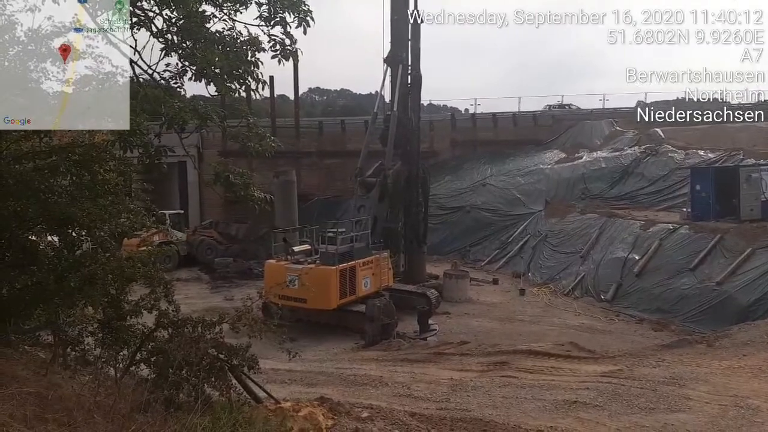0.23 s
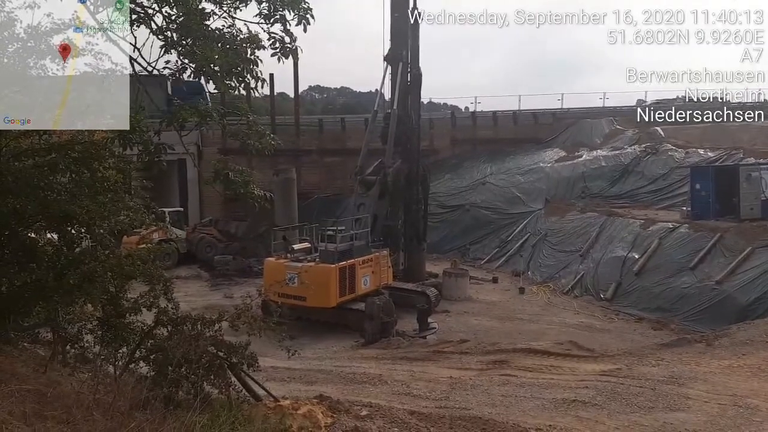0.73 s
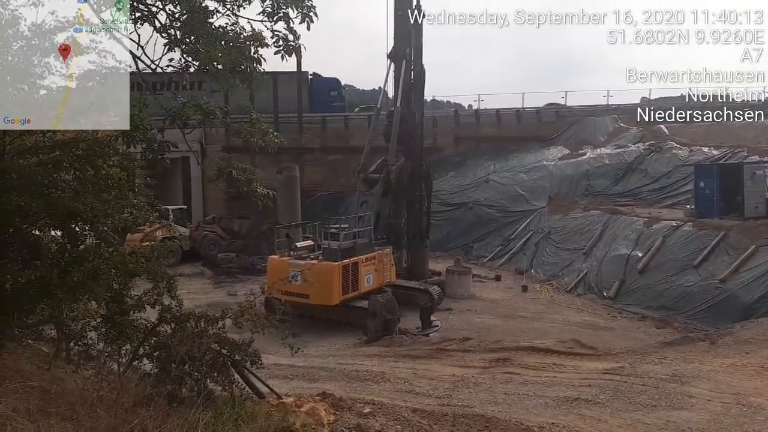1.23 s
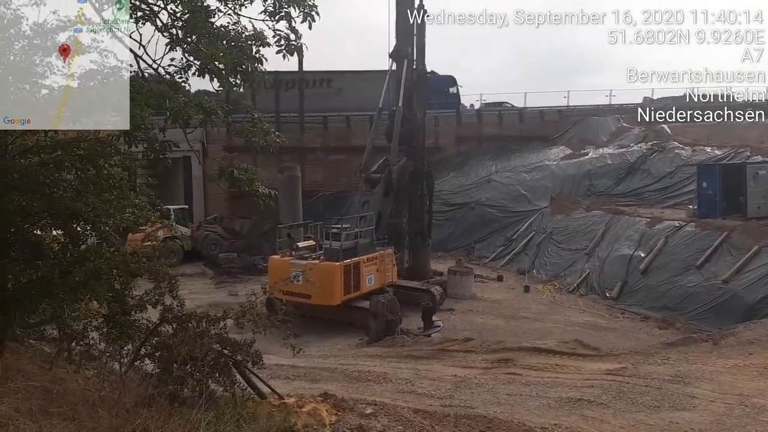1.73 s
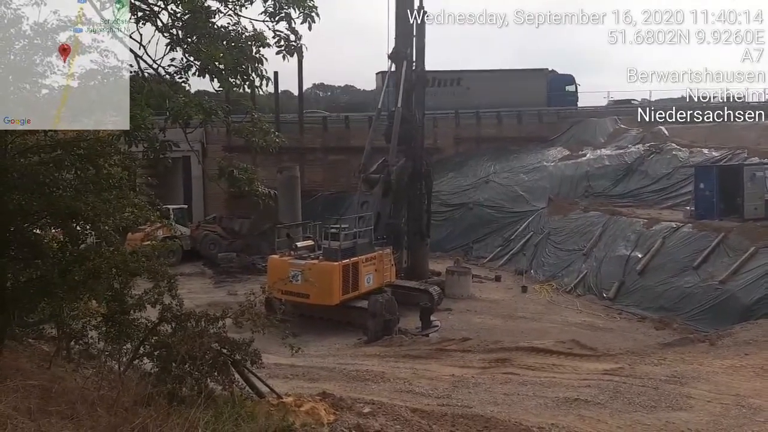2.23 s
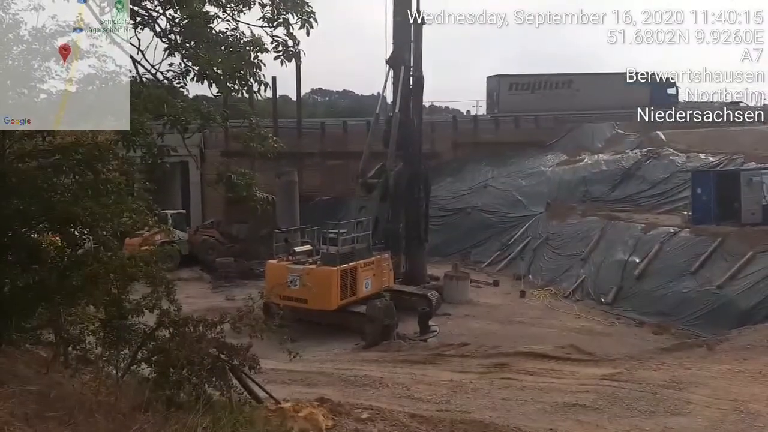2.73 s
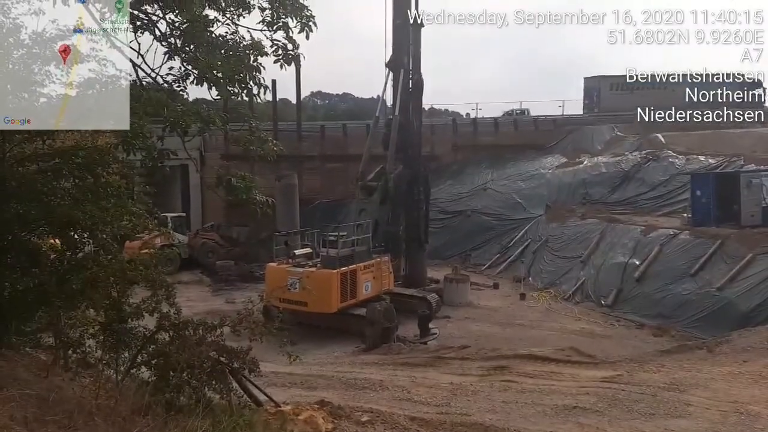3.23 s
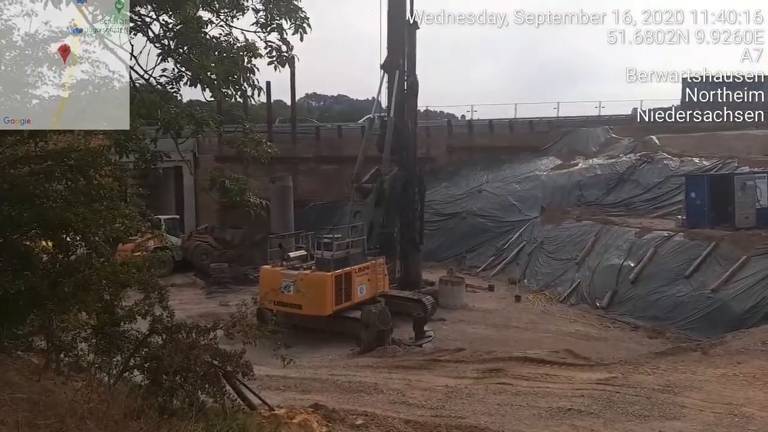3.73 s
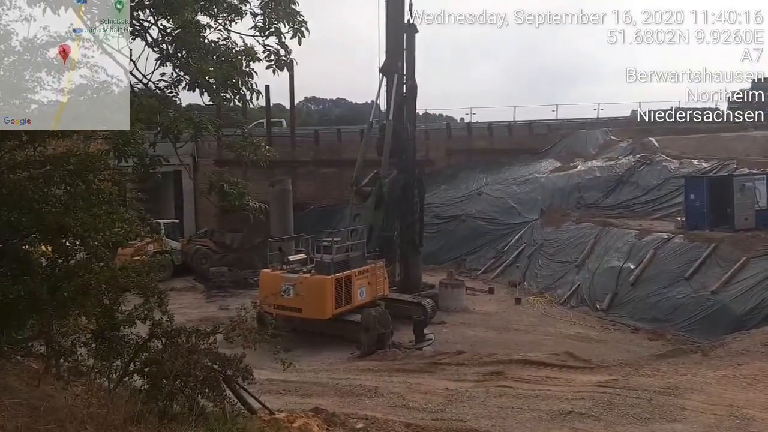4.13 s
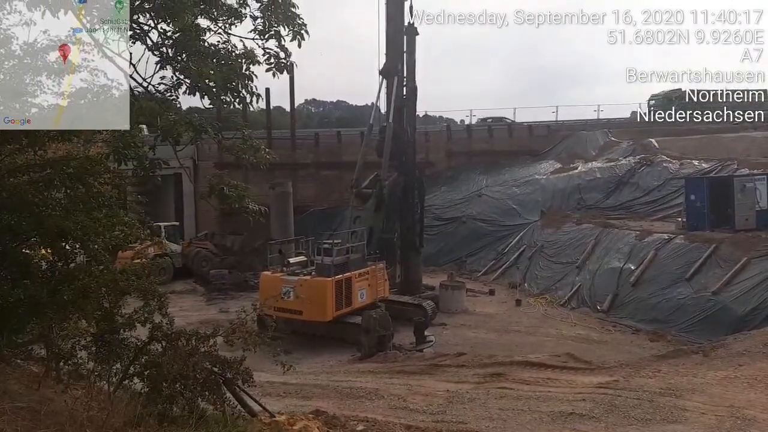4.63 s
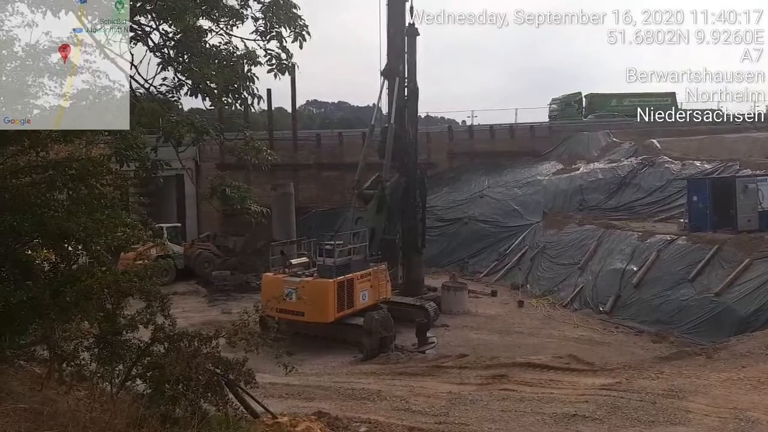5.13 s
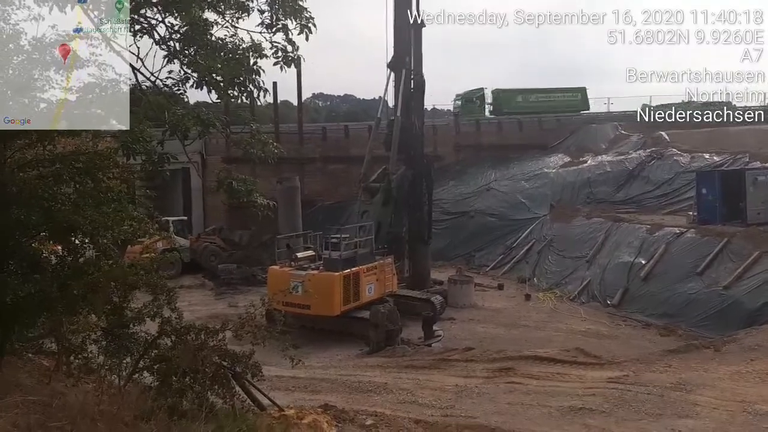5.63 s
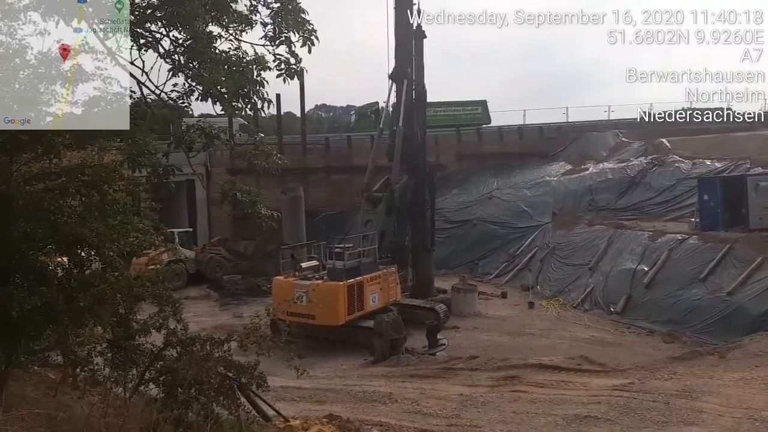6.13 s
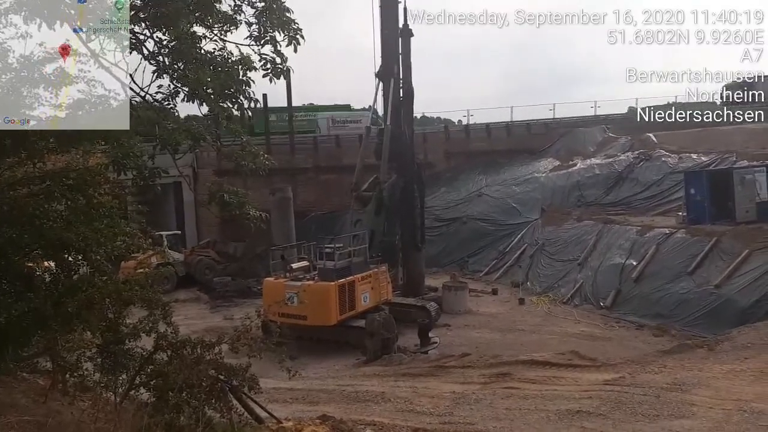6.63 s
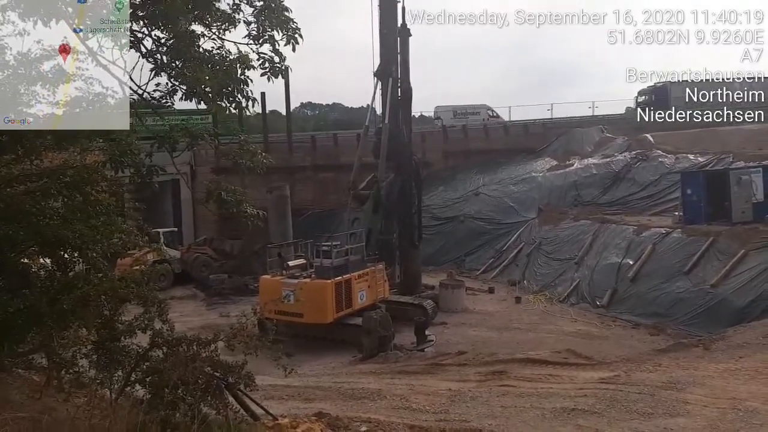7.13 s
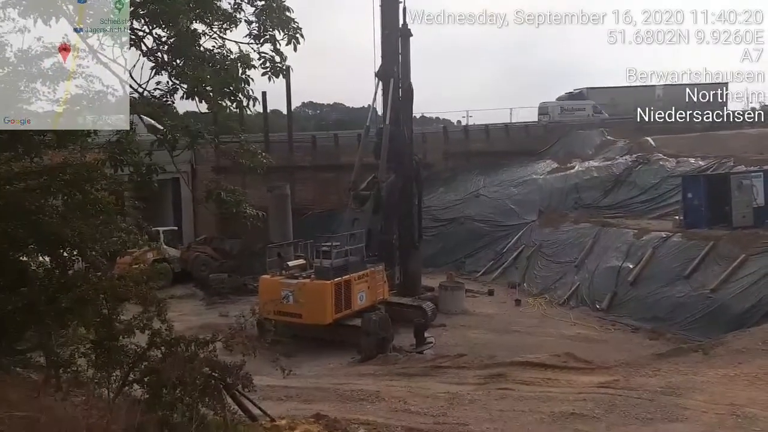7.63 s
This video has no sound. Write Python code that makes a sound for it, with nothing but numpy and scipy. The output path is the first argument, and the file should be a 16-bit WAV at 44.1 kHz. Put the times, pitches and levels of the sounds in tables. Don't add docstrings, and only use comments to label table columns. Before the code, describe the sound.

A heavy six-cylinder diesel on a piling rig runs throughout, heard from some distance on an open site. A deep, almost constant boom near 103 Hz dominates, over low exhaust roar, droning housing, grainy block clatter and thin fan hiss, with a weak electrical generator hum and distant tyre roar beneath. At about 0.34 s the sound drops out for a few hundredths of a second. It then stays steady until 4.6 s, when a load lowers the pitch very slightly and soft mid-range pump whines glide in and out. Tyre roar from the bridge grows from 5 s, strongest around 6.4 s. The engine recovers with a short roaring surge near 6.3 s, then sags again. A faint fuzzy turbo whistle climbs above 9 kHz, swelling at 6.9 and 7.75 s, with small air puffs at 7.0 and 7.5 s. The engine continues to the end, in wide, slightly treble-dulled stereo.

```python
import sys
import numpy as np
from scipy import signal
from scipy.fft import rfft, irfft, next_fast_len
from scipy.io import wavfile
from scipy.ndimage import uniform_filter1d, map_coordinates

SR = 44100
rng = np.random.default_rng(int(sys.argv[2]) if len(sys.argv) > 2 else 0)


def gain_from_db(level_db):
    decades = np.asarray(level_db, float) / 20
    return 10 ** decades


def to_wav(sig):
    pcm = np.clip(np.atleast_2d(sig), -1, 1) * 32767
    pcm = np.round(pcm).astype(np.int16)
    wavfile.write(sys.argv[1], SR, pcm.T)


N = 348390
T = np.arange(N) / SR
GAP_START_S, GAP_END_S = .3359, .3604


def unit(x):
    return x / np.sqrt(np.mean(x ** 2) + 1e-20)


def along(points, hz):
    f, v = np.transpose(points)
    return np.interp(np.log(hz + 1), np.log(f + 1), v)


def curves(rows):
    s, *columns = np.transpose(rows)
    return [np.interp(T, s, column) for column in columns]


def wobble(rate):
    coarse = np.arange(0, N + 32, 32)
    knots = rng.standard_normal(int(N * rate / SR) + 4)
    smooth = map_coordinates(knots, [coarse * rate / SR])
    return np.interp(np.arange(N), coarse, smooth)


def bell(middle_s, half_s):
    return np.exp(-((T - middle_s) / half_s) ** 2)


def filtered(x, response):
    m = next_fast_len(N + 8192)
    return irfft(rfft(x, m) * response(np.fft.rfftfreq(m, 1 / SR)), m)[..., :N]


def patchy(depth_db):
    z = signal.stft(rng.standard_normal((2, N)), nperseg=512)[2]
    field = rng.standard_normal(z.shape[1:])
    field = uniform_filter1d(field, size=8, axis=0)
    field = uniform_filter1d(field, size=10, axis=1)
    noise = signal.istft(z * gain_from_db(depth_db * unit(field)), nperseg=512)[1]
    return unit(noise[:, :N])


def cyclic(turns, repeat):
    pattern = rng.standard_normal((2, 2570))
    place = (turns / 2 % 1 * pattern.shape[1]).astype(int)
    again = pattern[:, place]
    repeat = np.clip(repeat, 0, 1)
    return np.sqrt(repeat) * again + np.sqrt(1 - repeat) * patchy(depth_db=.5)


def coloured(pair, gain):
    out = filtered(pair, gain)
    return out / np.std(out[0])


# (time [s], firing rate [Hz])
FIRING_RATE = [(4.6, 102.95), (4.75, 102.7), (5.05, 101.2), (5.25, 100.5), (5.45, 100.6), (5.8, 101.5),
               (5.97, 101.5), (6.3, 103.3), (6.55, 101.3), (6.7, 101.0), (6.93, 100.75), (7.3, 101.7),
               (7.55, 101.6), (7.9, 101.8)]
GOVERNED_HZ, SAG_HZ = 102.9, 1.8
SWAY_HZ, SWAY_S, SLOWEST_S = .03, 1.8, 1.2


def shaft():
    firing_hz, = curves(FIRING_RATE)
    load = np.clip((GOVERNED_HZ - firing_hz) / SAG_HZ, 0, 1)
    unloaded = T < FIRING_RATE[0][0]
    firing_hz = firing_hz - SWAY_HZ * np.cos(2 * np.pi * (T - SLOWEST_S) / SWAY_S) * unloaded
    running = (T < GAP_START_S) | (T > GAP_END_S - .0011)
    rate = (firing_hz + .04 * wobble(4)) / 3 * running
    turns = np.cumsum(rate) / SR
    return turns - turns[round(GAP_START_S * SR)], load


# (multiple of shaft speed [1], free-running level [dB], loaded level [dB])
SHAFT_ORDERS = [(1.0, -54, -54), (1.5, -42, -42), (2.0, -52, -46), (2.5, -46, -50), (3.0, -19, -16.3),
                (4.0, -58, -58), (4.5, -48, -46), (5.5, -46, -50), (6.0, -39.5, -45), (6.5, -51, -50),
                (7.0, -41.5, -40), (7.5, -49, -52), (8.0, -36, -40), (8.5, -49, -52), (9.0, -38.5, -40),
                (9.5, -48, -47), (11.0, -56, -52), (12.0, -53, -58), (13.0, -54, -54), (15.0, -56, -62),
                (15.5, -56, -54), (16.0, -56, -60), (17.0, -56, -60), (18.0, -46, -51), (18.5, -55, -58),
                (19.5, -54, -56), (20.0, -49, -54), (21.0, -52, -58), (22.5, -45.5, -52), (23.0, -50, -52),
                (23.5, -52, -56), (24.0, -46.5, -53), (24.5, -59, -62), (25.0, -47, -54), (25.5, -58, -62),
                (26.0, -53, -58), (26.5, -55, -62), (27.5, -58, -65), (28, -62, -66), (29, -57, -64),
                (30.0, -57, -64), (32, -59, -64), (33.5, -60, -66), (38, -61, -64), (38.5, -60, -63),
                (40.0, -55, -58), (40.5, -60, -63), (42.5, -58, -62), (43, -60, -63), (43.5, -59, -62),
                (44, -58, -62), (45, -61, -64), (54.5, -61, -65), (56, -57, -62), (56.5, -57, -62),
                (57, -59, -63), (57.5, -57, -62), (58, -55, -61), (59, -59, -63), (59.5, -53.5, -59),
                (60, -58, -62)]
# (gear ratio [1], free-running level [dB], loaded level [dB], phase lead [rad])
GEARED_PUMPS = [(9.031, -44, -60, 1.3), (18.182, -44.5, -70, -2.7), (9.973, -41, -48, 0),
                (19.946, -48, -60, 0), (29.92, -62, -70, 0)]
# (time [s], share [1])
FIRING_LOPE = [(0, -.07), (1.8, -.06), (2.7, .06), (4.0, .09), (5.2, .05), (5.5, 0), (6.3, .06), (6.7, 0)]
RIPPLE_FREE_RAD, RIPPLE_LOADED_RAD = .24, .07


def orders(turns, load):
    out = np.zeros(N)
    for order, free_db, loaded_db, *lead in SHAFT_ORDERS + GEARED_PUMPS:
        weak = np.clip(-(free_db + 19.5) / 25, 0, 1)
        level = free_db + load * (loaded_db - free_db)
        level = level + weak * (1.5 + .7 * wobble(9))
        start = 2 * np.pi * rng.random()
        if lead or order % 3 == 0:
            start = sum(lead) - np.pi / 2 * round(order / 3) * (order > 3)
        drift = .12 * weak * wobble(8) + start
        if order == 3:
            ripple = np.interp(load, [0, 1], [RIPPLE_FREE_RAD, RIPPLE_LOADED_RAD])
            drift += ripple * np.sin(2 * np.pi * turns)
            lope = curves(FIRING_LOPE)[0] * np.cos(2 * np.pi * turns)
            level = level + 20 * np.log10(1 + lope)
        out += gain_from_db(level) * np.sqrt(2) * np.sin(2 * np.pi * order * turns + drift)
    return out


IDLE_LEVEL = [-29, -35.5, -36, -48.5]
WORK_CHANGE = [2, 1.5, -1.74, -0.89]
SURGE_RISE = [3.1, 2.5, 0.26, 0.5]


def effort_db():
    work = np.interp(T, [3.5, 8.1], [0, 1])
    surge = bell(middle_s=6.27, half_s=.17)
    drift = 0.092 * wobble(1.78)
    layers = zip(IDLE_LEVEL, WORK_CHANGE, SURGE_RISE)
    return [idle + change * work + rise * surge + drift for idle, change, rise in layers]


# (frequency [Hz], density [dB per Hz])
EXHAUST_SPECTRUM = [(12, -60), (25, -34), (45, -4.5), (62, -1), (78, -4), (92, -3), (125, -6.5),
                    (150, -5.5), (175, -9.5), (220, -4.5), (310, -7), (370, -14.5), (500, -39), (900, -120)]
# (frequency [Hz], density [dB per Hz])
HOUSING_SPECTRUM = [(200, -120), (340, -40), (400, -9.5), (480, -8), (580, -6), (690, -1.5), (840, -3),
                    (940, -14.5), (1100, -42), (2000, -120)]
# (frequency [Hz], density [dB per Hz])
BLOCK_SPECTRUM = [(560, -21), (950, -3), (1500, -1.5), (1760, -5.5), (2000, -1.5), (2290, -8.5), (2540, -8),
                  (3860, -8), (6300, -17), (8190, -44), (13900, -120)]
# (frequency [Hz], width [Hz], level over the block noise [dB])
BLOCK_PANELS = [(1290, 310, -2), (1510, 63, 2), (2037, 140, 5.5), (2556, 164, 5), (3190, 300, 0.5),
                (3840, 600, 0.5), (4500, 110, 4), (5130, 370, 5.5), (5590, 120, 7)]
# (frequency [Hz], density [dB per Hz])
FAN_SPECTRUM = [(3500, -30), (5800, -5.5), (6500, -9), (7150, -7), (8200, -6), (8900, -7), (9200, -10.5),
                (10000, -9), (11300, -5.5), (13400, -6), (14300, -7.5), (14900, -16.5), (15500, -35)]
# (frequency [Hz], change [dB])
FAN_WORKING = [(7500, 1.5), (8600, -4), (9500, 4.5), (11000, 0), (12800, -0.5), (14300, -4), (14900, 10),
               (15400, 17)]
# (frequency [Hz], change [dB])
FAN_THINNED = [(7500, -2), (8700, 2.5), (10000, -8), (11200, -0.5), (12800, -7), (14000, 1), (15000, 2)]


def panel_ring(f):
    peaks = [gain_from_db(2 * db) / (1 + (2 * (f - c) / width) ** 2) ** 2 for c, width, db in BLOCK_PANELS]
    return np.sqrt(1 + sum(peaks))


def fan_hiss():
    air = patchy(depth_db=.5)
    early = coloured(air, lambda f: gain_from_db(along(FAN_SPECTRUM, f)))
    later = coloured(air, lambda f: gain_from_db(along(FAN_SPECTRUM, f) + along(FAN_WORKING, f)))
    fan = early + np.interp(T, [5.2, 6.15], [0, 1]) * (later - early)
    thinned = filtered(fan, lambda f: gain_from_db(along(FAN_THINNED, f)))
    return fan + bell(middle_s=6.15, half_s=0.63) * (thinned - fan)


def engine_noise(turns, load):
    exhaust_db, housing_db, block_db, fan_db = effort_db()
    gust = filtered(rng.standard_normal(N), lambda f: (f > 5) / (1 + (f / 18) ** 2))
    gust_db = 1.02 * unit(gust)
    exhaust = coloured(patchy(depth_db=0.34), lambda f: gain_from_db(along(EXHAUST_SPECTRUM, f)))
    housing = coloured(cyclic(turns, 0.089), lambda f: gain_from_db(along(HOUSING_SPECTRUM, f)))
    block_noise = cyclic(turns, .08 - 0.032 * load)
    block = coloured(block_noise, lambda f: gain_from_db(along(BLOCK_SPECTRUM, f)) * panel_ring(f))
    low = gain_from_db(exhaust_db - 2.0) * exhaust + gain_from_db(housing_db - 2.0 + 0.1 * gust_db) * housing
    return low + gain_from_db(block_db - .7 + gust_db) * block + gain_from_db(fan_db + gust_db) * fan_hiss()


# (start [s], end [s], start frequency [Hz], end frequency [Hz], level [dB])
PUMP_WHINES = [(5.2, 5.75, 334, 336.5, -39), (6.5, 7.12, 338, 336, -38), (7.45, 8.2, 339, 339.5, -40),
               (4.7, 5.45, 706, 714, -44), (5.5, 5.9, 716, 719, -38), (4.85, 5.65, 670, 669.5, -38.5),
               (6.7, 7.3, 679, 677, -37), (6.85, 7.55, 712, 722, -41), (7.2, 7.7, 652, 650, -44),
               (6.6, 7.3, 1005, 1010, -51), (7.2, 8.2, 1015, 1019, -49.5), (6.2, 8.2, 1362, 1372, -49),
               (5.7, 6.55, 304.5, 310, -38), (4.1, 4.8, 2585, 2585, -52), (2.9, 4.3, 7630, 7630, -71),
               (6.65, 7.4, 786, 796, -43), (7.4, 8.2, 800, 822, -44), (6.75, 7.1, 692, 694, -40),
               (6.0, 6.8, 630, 606, -43), (4.8, 5.6, 1320, 1310, -52), (7.0, 8.2, 58, 59, -38),
               (4.1, 4.9, 57, 56, -41), (7.55, 8.2, 676, 680, -43)]


def pumps():
    out = np.zeros(N)
    for start, end, start_hz, end_hz, db in PUMP_WHINES:
        fade = np.clip(np.minimum(T - start, end - T) / 0.077, 0, 1)
        hz = np.interp(T, [start, end], [start_hz, end_hz]) * (1 + .0013 * wobble(8))
        flutter_db = 1.7 * wobble(9)
        out += fade * gain_from_db(db + 3.0 + flutter_db) * np.sin(2 * np.pi * np.cumsum(hz) / SR)
    return out


# (time [s], frequency [Hz], level [dB])
TURBO_WHISTLE = [
    (5.2, 8500, -85),
    (6.75, 9170, -68),
    (6.88, 9270, -55),
    (7.0, 9350, -54),
    (7.2, 9480, -60),
    (7.5, 9630, -61),
    (7.65, 9720, -57),
    (7.75, 9780, -53),
    (7.9, 9830, -56),
]


def turbo():
    hz, db = curves(TURBO_WHISTLE)
    phase = 2 * np.pi * np.cumsum(hz + 75 * wobble(200)) / SR
    return gain_from_db(db + 5 + 2.2 * wobble(45)) * np.sin(phase)


# (time [s], length [s], level [dB])
HISS_PUFFS = [
    (6.96, .07, -60),
    (7.487, .045, -51.5),
]


def puff():
    hiss = coloured(rng.standard_normal((2, N)), lambda f: 1 / (1 + (9000 / (f + 1)) ** 8))
    envelope = np.zeros(N)
    for start, length, db in HISS_PUFFS:
        since = (T - start) / length
        envelope += gain_from_db(db) * (since > 0) * np.exp(-np.clip(since, 0, 50) ** 2)
    return hiss * envelope


# (time [s], level [dB])
LORRY_LEVEL = [
    (0, -49),
    (4.6, -50),
    (5.2, -41.5),
    (5.9, -42),
    (6.4, -39),
    (7.0, -41),
    (7.9, -45),
]
# (frequency [Hz], density [dB per Hz])
TYRE_SPECTRUM = [(150, -120), (300, -24), (360, 3.5), (450, 2.5), (560, 7), (680, -14), (1500, -120)]


def lorries():
    roar = coloured(patchy(depth_db=-2.5), lambda f: gain_from_db(along(TYRE_SPECTRUM, f)))
    return gain_from_db(curves(LORRY_LEVEL)[0]) * roar


# (frequency [Hz], level [dB])
GENERATOR_HUM = [
    (50.03, -46),
    (100.06, -42),
    (150.1, -53),
    (65.0, -47),
]


def generator():
    out = np.zeros(N)
    for hz, db in GENERATOR_HUM:
        cycles = hz * T + rng.random() + .05 * wobble(2)
        out += gain_from_db(db + wobble(2)) * np.sqrt(2) * np.sin(2 * np.pi * cycles)
    return out


# (frequency [Hz], side minus front [dB])
SIDE_LEVEL = [(25, -4), (60, -13), (100, -20), (140, -16), (230, -20), (330, -8.5), (500, -8), (760, -5.5),
              (1160, 1.5), (1780, -2.5), (2720, -4.5), (4150, 0), (6340, -1), (9680, 2), (14800, -2)]
# (frequency [Hz], share of the side that is the front a quarter turn ahead, so the right port lags [1])
LATE_SHARE = [(60, .3), (300, 0.32), (900, 0.22), (2000, 0.65), (3100, .2), (4500, .55), (8000, .42),
              (14000, .25)]
# (frequency [Hz], left minus right [dB])
LEFT_LEAN = [(30, -2), (110, 1.0), (200, 1.5), (380, 0.5), (690, 0.5), (1280, -1), (2360, 3.5), (4350, -1),
             (8020, 0), (14800, -1)]


def scene():
    turns, load = shaft()
    front, scattered = engine_noise(turns, load) + lorries() + puff()
    front = front + orders(turns, load) + pumps() + turbo() + generator()
    late = lambda f: np.clip(along(LATE_SHARE, f), 0, .99)
    side = filtered(scattered, lambda f: gain_from_db(along(SIDE_LEVEL, f)) * np.sqrt(1 - late(f) ** 2))
    side += filtered(front, lambda f: gain_from_db(along(SIDE_LEVEL, f)) * 1j * late(f))
    left_right = np.array([front + side, front - side])
    return filtered(left_right, lambda f: gain_from_db(np.outer([.5, -.5], along(LEFT_LEAN, f))))


def roll_off(x):
    return signal.sosfilt(signal.butter(12, 15480, fs=SR, output="sos"), x)


# (frequency [Hz], width [Hz], level [dB])
HOUSING_DIPS = [
    (8500, 250, -4),
    (9900, 250, -4.5),
]


def record(dry):
    dips_db = lambda f: sum(db / (1 + (2 * (f - c) / width) ** 2) for c, width, db in HOUSING_DIPS)
    heard = filtered(dry, lambda f: gain_from_db(dips_db(f)))
    lost = (T > GAP_START_S) & (T < GAP_END_S)
    mix = np.where(lost, -.006, heard)
    return roll_off(mix)


dry = scene()
out = record(dry)
to_wav(out)
```